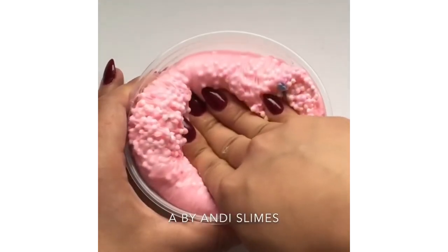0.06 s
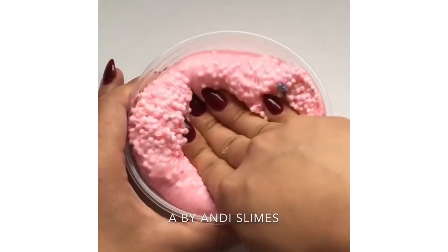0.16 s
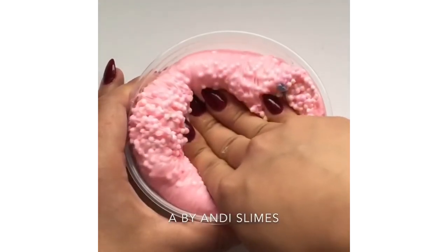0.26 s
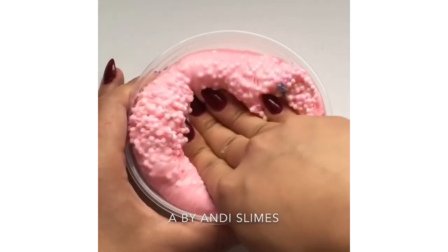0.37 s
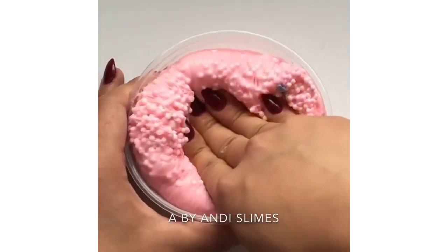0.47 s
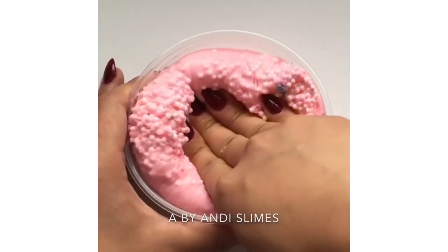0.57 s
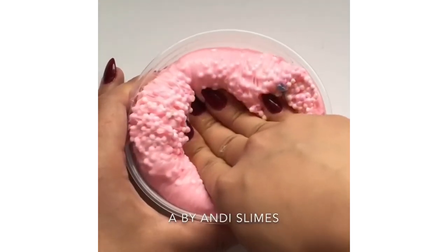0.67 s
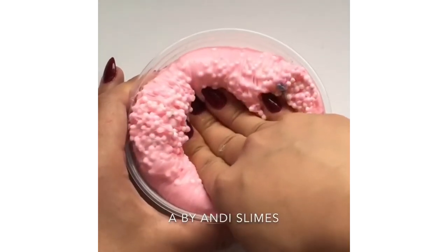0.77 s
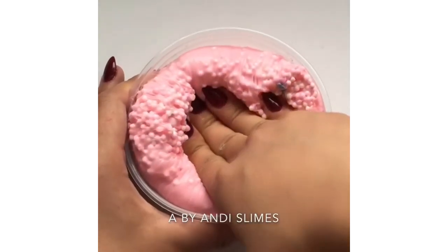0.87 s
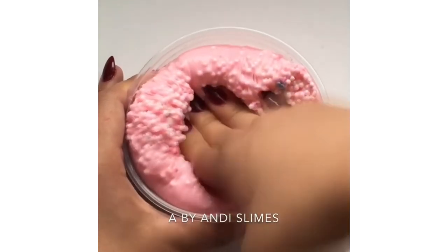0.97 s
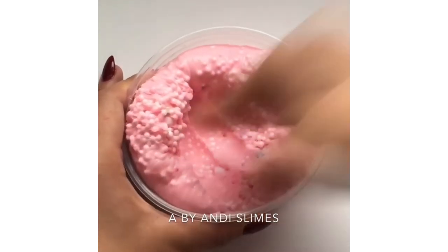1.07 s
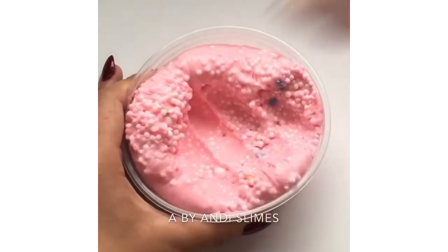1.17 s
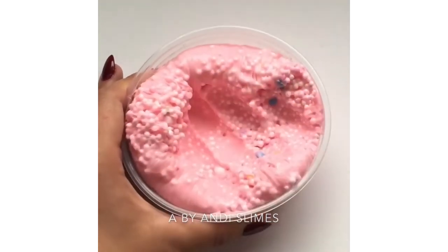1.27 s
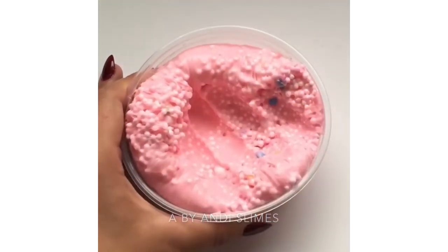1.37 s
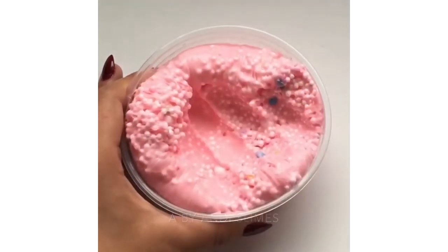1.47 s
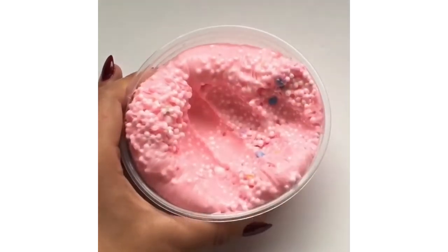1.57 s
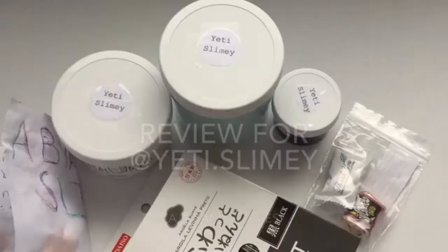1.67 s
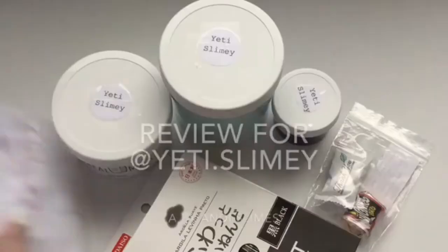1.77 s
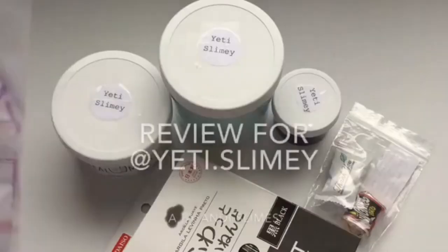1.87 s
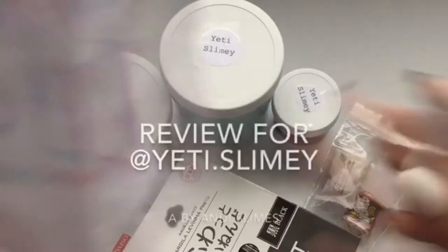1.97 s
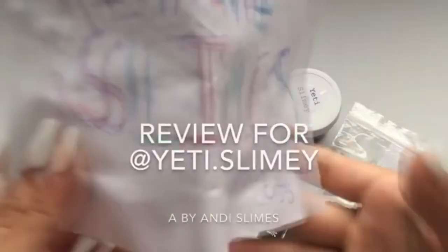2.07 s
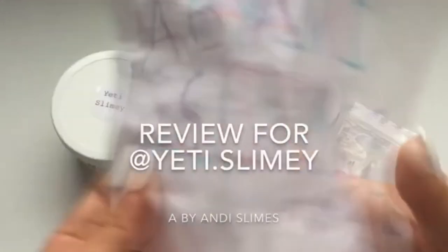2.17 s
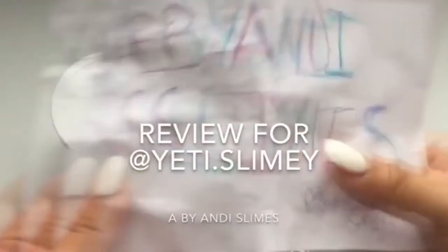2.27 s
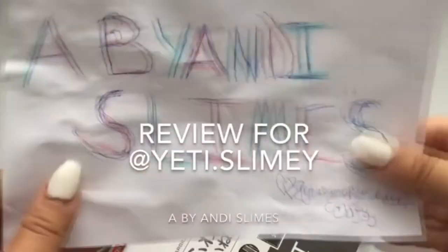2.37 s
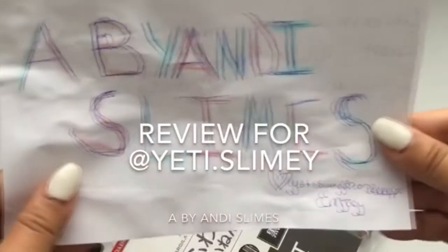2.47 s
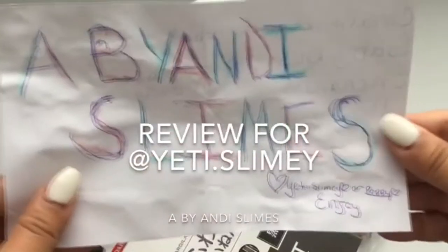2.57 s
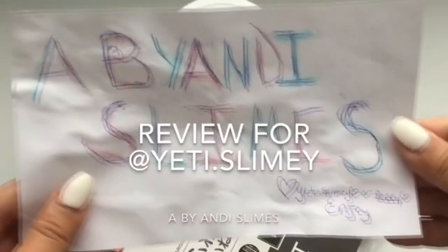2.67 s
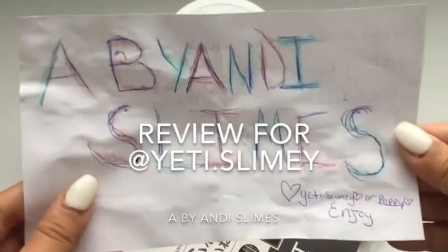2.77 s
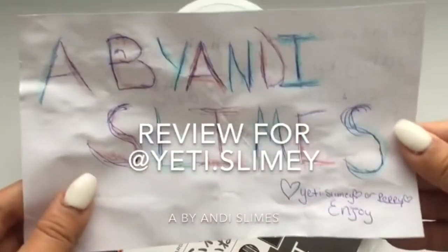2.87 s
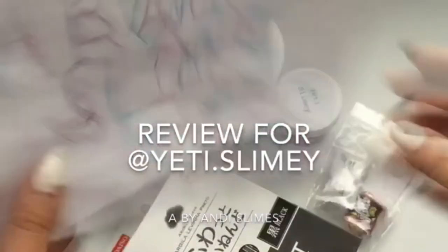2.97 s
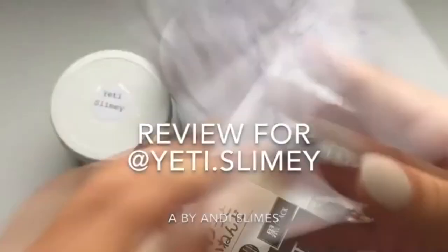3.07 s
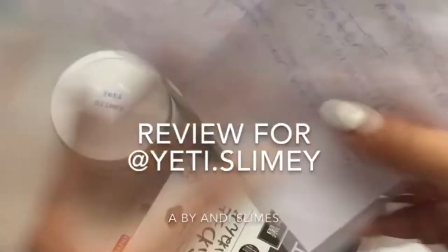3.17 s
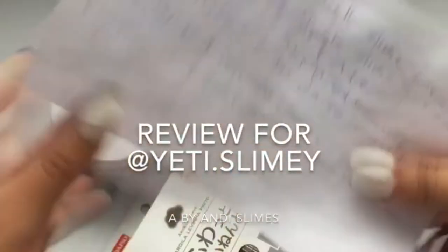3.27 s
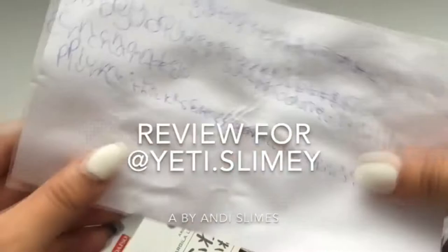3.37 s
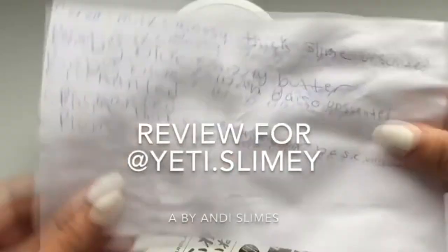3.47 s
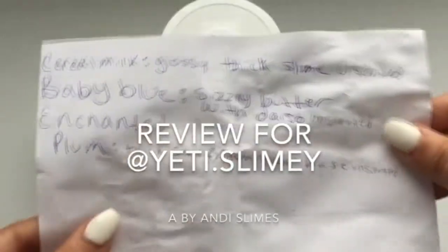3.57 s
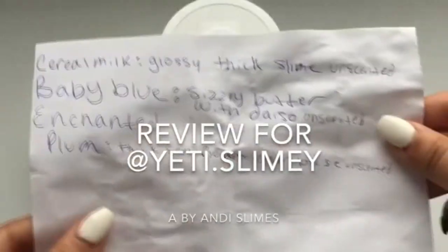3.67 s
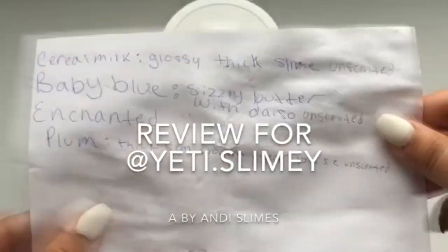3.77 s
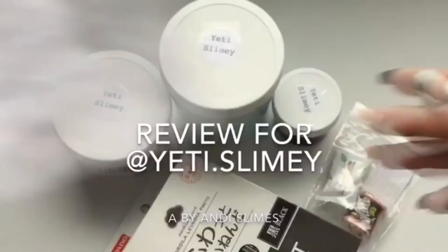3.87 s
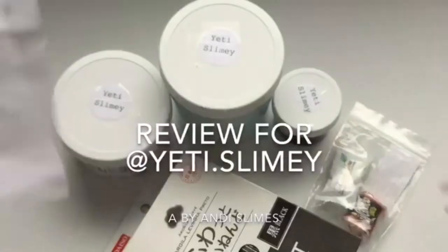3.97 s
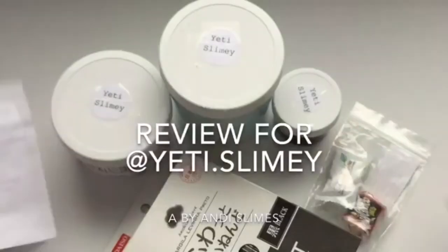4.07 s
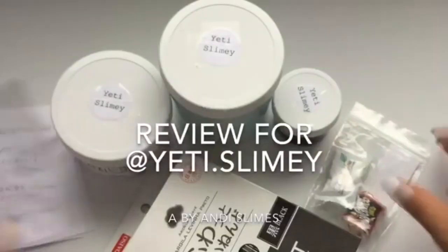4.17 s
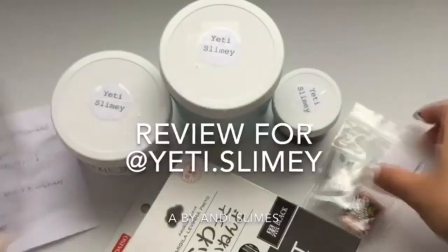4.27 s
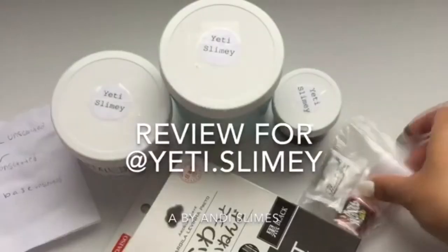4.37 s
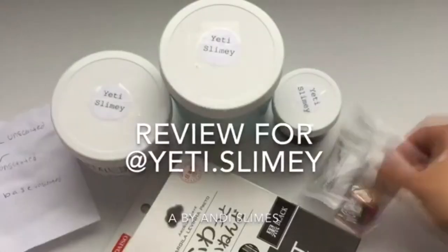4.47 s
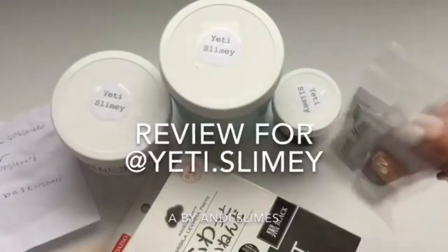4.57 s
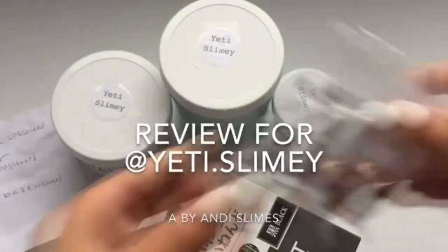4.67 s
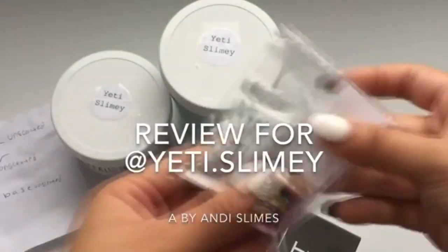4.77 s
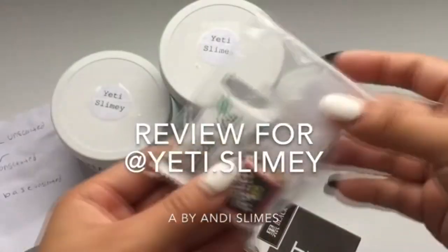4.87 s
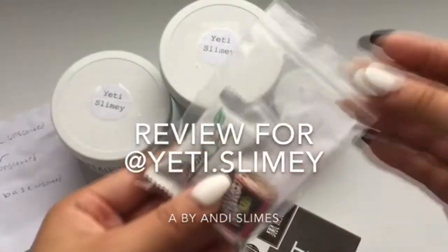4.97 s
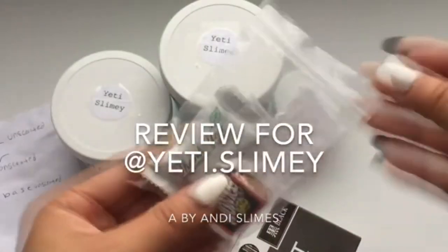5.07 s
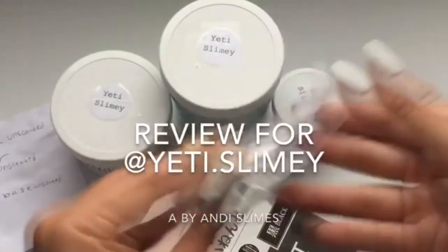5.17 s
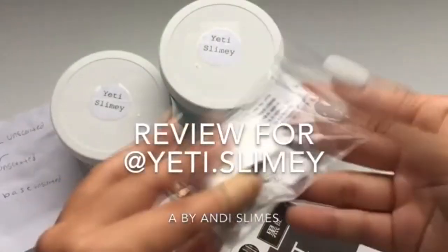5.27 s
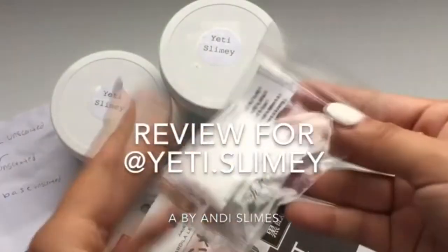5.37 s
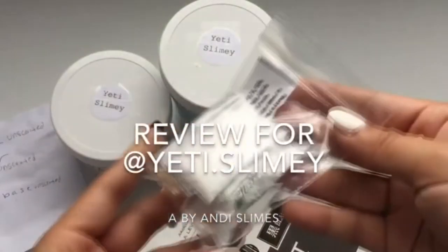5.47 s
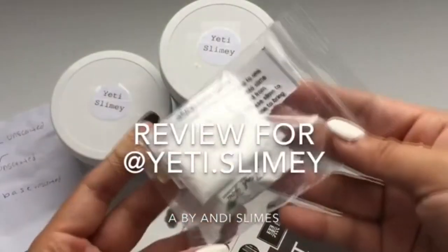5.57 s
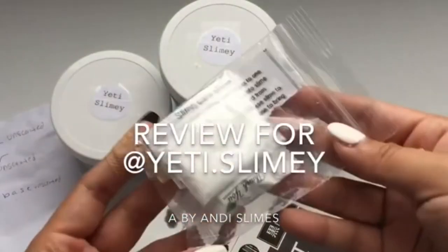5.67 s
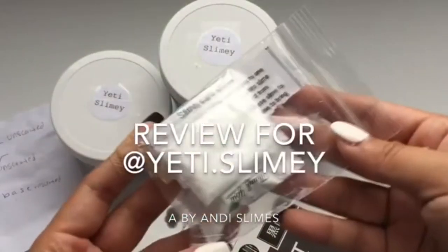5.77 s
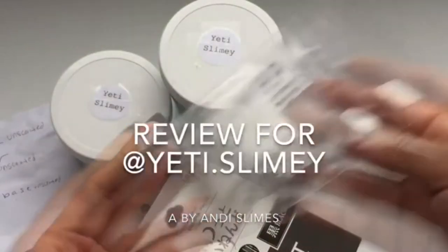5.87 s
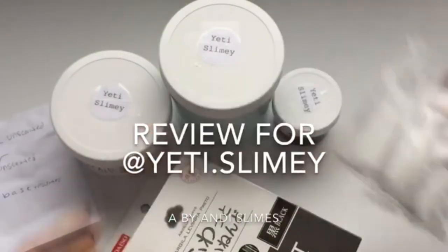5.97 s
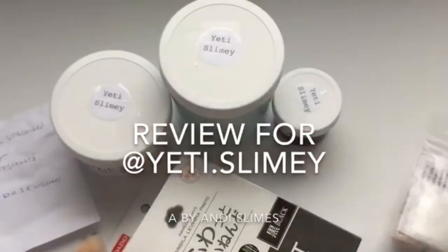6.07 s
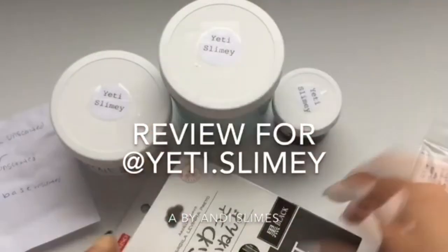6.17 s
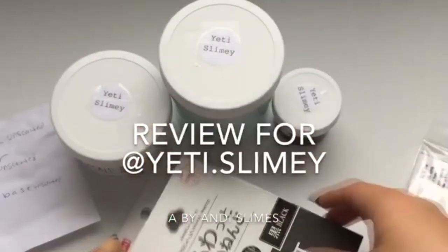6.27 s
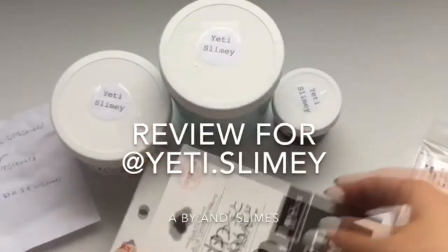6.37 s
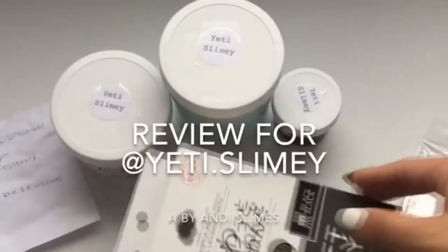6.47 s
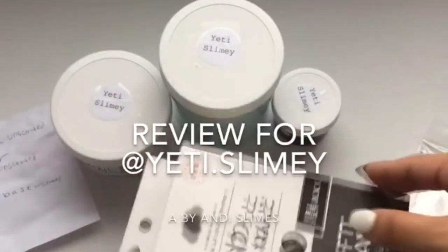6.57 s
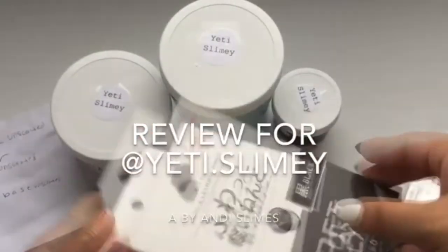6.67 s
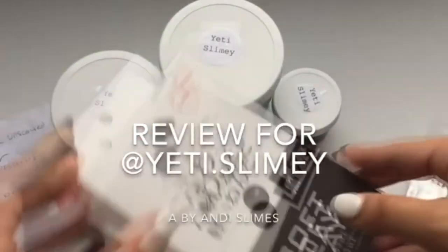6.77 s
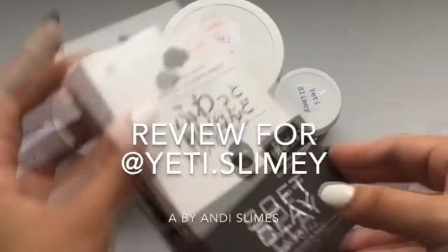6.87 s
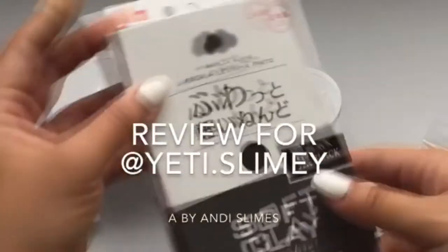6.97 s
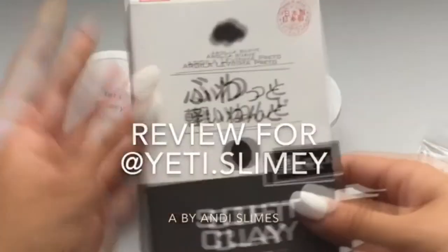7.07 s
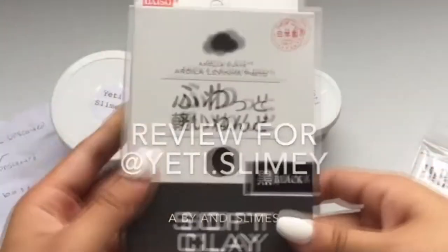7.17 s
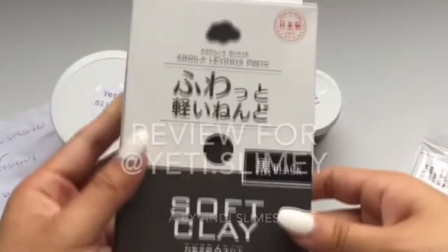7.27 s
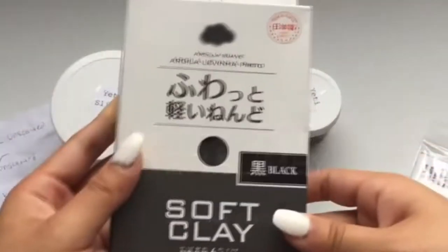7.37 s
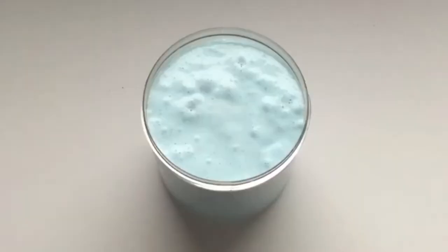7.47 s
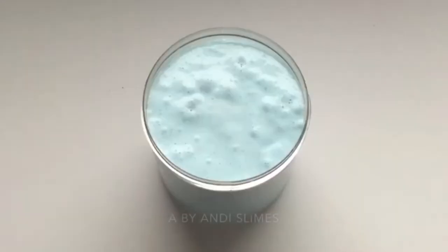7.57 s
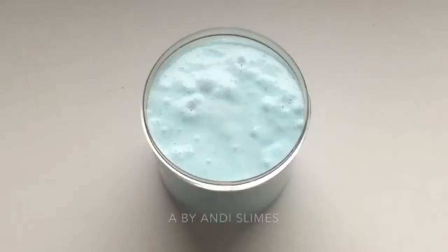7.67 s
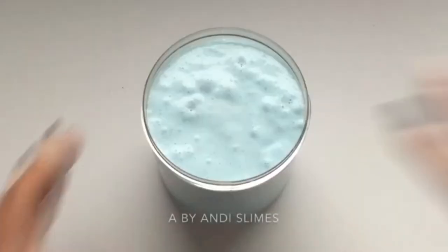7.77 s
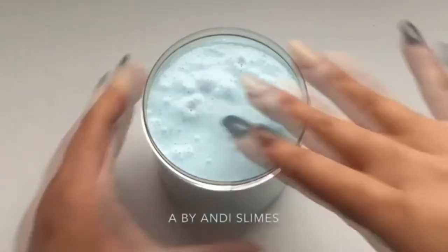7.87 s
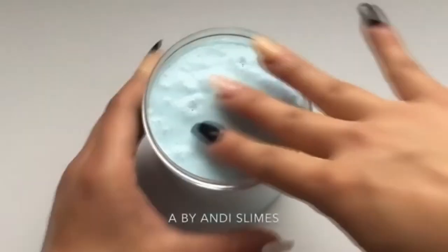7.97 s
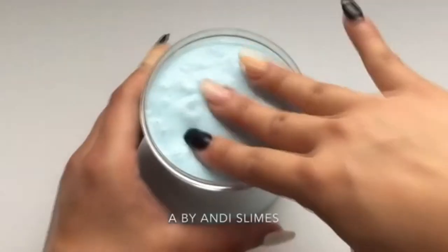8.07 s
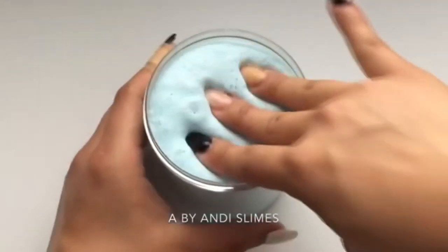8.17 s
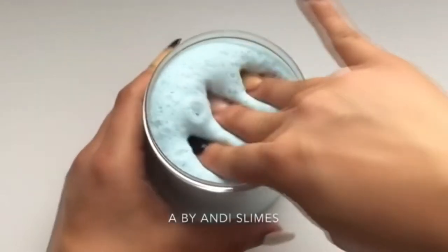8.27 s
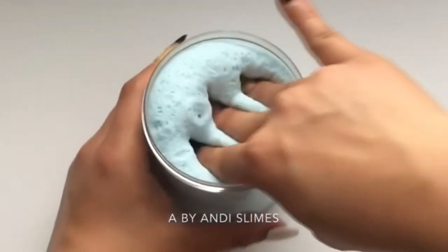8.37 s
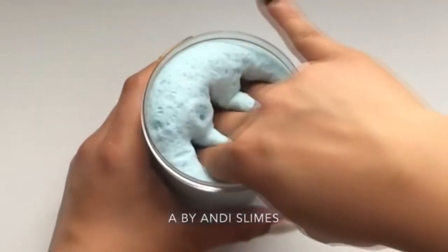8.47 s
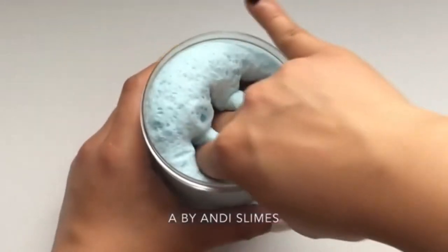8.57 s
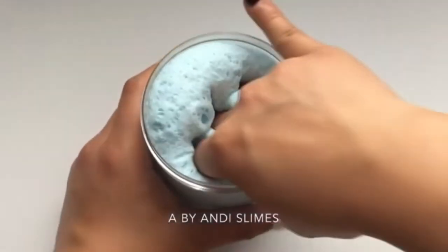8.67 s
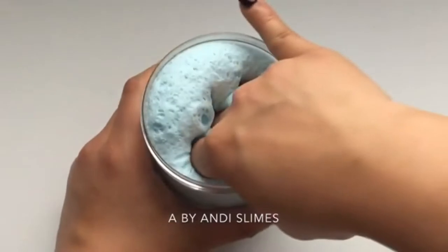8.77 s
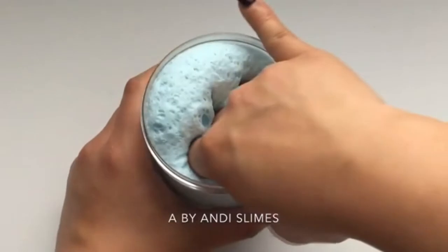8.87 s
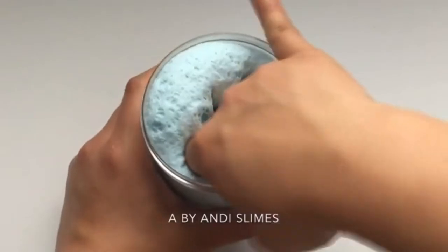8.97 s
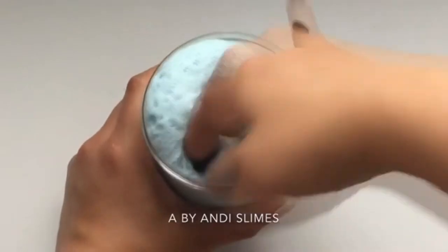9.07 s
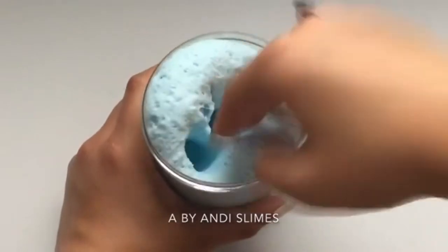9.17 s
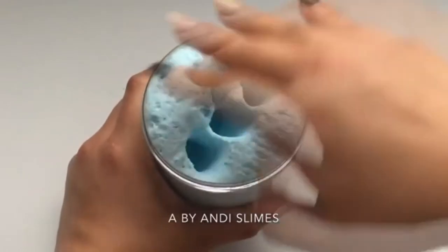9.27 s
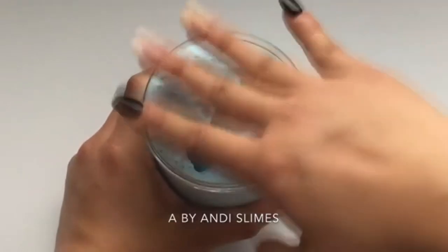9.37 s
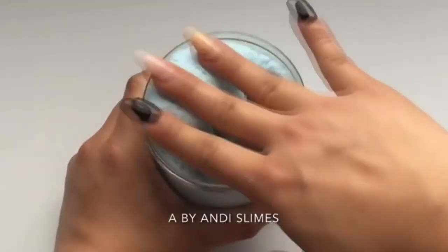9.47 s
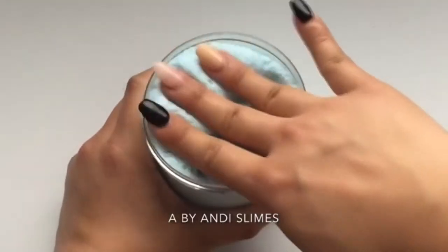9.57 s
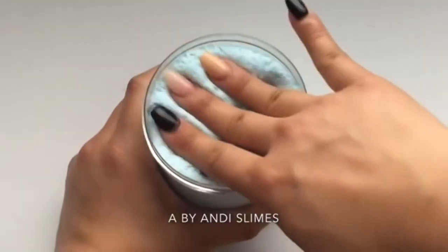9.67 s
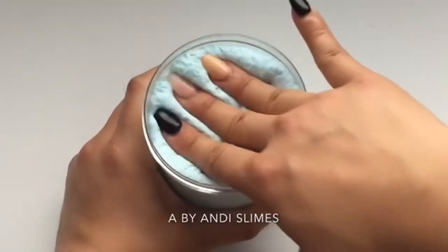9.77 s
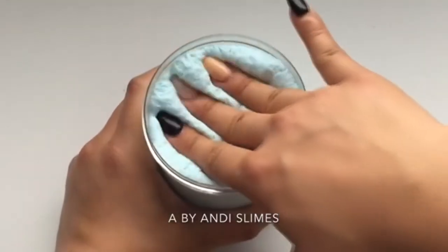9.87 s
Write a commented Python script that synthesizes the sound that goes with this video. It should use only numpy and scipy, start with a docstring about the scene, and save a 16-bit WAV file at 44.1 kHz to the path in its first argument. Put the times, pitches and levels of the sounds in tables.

```python
"""A hiss, then sticky crackles as fingers pull out of a tub of beaded slime, close to the microphone.
In a quieter room, paper notes are waved and slid, a small plastic bag crinkles and drops, and a card packet
is picked up. Last, fingers sink into foamy slime: bubbles fizz and trapped air pops with soft thuds.
Handling is clumped clicks over rubbing noise; snaps are ringing noise bursts; thuds are damped low modes."""
import sys
import numpy as np
from scipy import signal
from scipy.fft import rfft, irfft, next_fast_len
from scipy.io import wavfile
from scipy.ndimage import map_coordinates

SR = 44100
rng = np.random.default_rng(int(sys.argv[2]) if len(sys.argv) > 2 else 0)


def put_to_file(sound):
    """Save the sound as 16-bit audio at rate SR, in the file named by the first command-line argument."""
    columns = np.atleast_2d(sound).T  # one column per channel
    safe = np.clip(columns, -1, 1)
    whole_steps = np.round(safe * 32767)
    wavfile.write(sys.argv[1], SR, whole_steps.astype(np.int16))


N = 437467  # samples in the scene

# Colour of a bursting air pocket, in either slime: frequency_hz, relative_level_db
POP_COLOUR = [(40, -9), (300, 7.5), (900, 2), (1800, 2), (5000, 0), (14000, -4.5)]

SHORT = 4096  # samples in one snap or ringing body
SHORT_HZ = np.fft.rfftfreq(SHORT, 1 / SR)
SHORT_S = np.arange(SHORT) / SR
SWELL_DB = 20  # level change covered in a movement's rise or fall time


def amp(db):
    """Decibels to gain."""
    return 10 ** (np.asarray(db) / 20)


def unit(x):
    """Scale to rms 1."""
    return x / np.sqrt(np.mean(x ** 2) + 1e-20)


def burst(x, seconds):
    """Scale a short sound to the energy of rms 1 held for so many seconds."""
    return x * np.sqrt(seconds * SR / (np.sum(x ** 2) + 1e-20))


def along(points, hz):
    """Read (frequency_hz, value) points on a log frequency axis."""
    f, v = np.transpose(points)
    return np.interp(np.log(hz + 1), np.log(f + 1), v)


def wobble(rate):
    """Random levels joined by straight lines, rate knots a second."""
    knots = rng.standard_normal(int(N * rate / SR) + 4)
    return map_coordinates(knots, [np.arange(N) * rate / SR], order=1)


def filtered(x, response):
    """Multiply the spectrum of x by a response of frequency."""
    m = next_fast_len(N + SR // 2)
    hz = np.fft.rfftfreq(m, 1 / SR)
    return irfft(rfft(x, m) * response(hz), m)[:N]


def coloured(x, spectrum):
    """Filter x by a spectrum curve, then scale to rms 1."""
    return unit(filtered(x, lambda hz: amp(along(spectrum, hz))))


def resonances(modes, hz):
    """Causal response of a few damped modes, alternating in sign."""
    response = 0
    for k, (centre, width, db) in enumerate(modes):
        damping = 1j * hz * width
        response = response + (-1) ** k * amp(db) * damping / (centre * centre - hz * hz + damping)
    return response


def causal(db):
    """Minimum-phase response for a dB curve: a sharp start, then ringing."""
    cepstrum = irfft(np.log(amp(db) + 1e-6))
    fold = np.r_[1, np.full(SHORT // 2 - 1, 2), 1, np.zeros(SHORT // 2 - 1)]
    return np.exp(rfft(cepstrum * fold))


def add(track, s, sound):
    """Mix a sound into the track at time s."""
    start = int(np.clip(round(s * SR), 0, N))
    track[start:start + len(sound)] += sound[:N - start]


def effort(moves):
    """Hand movements as a gain: each swells and dies away, and overlapping ones add in power."""
    t = np.arange(0, N, 16) / SR
    power = np.zeros(len(t))
    for peak_s, db, rise_s, fall_s in moves:
        distance = np.maximum((peak_s - t) / rise_s, (t - peak_s) / fall_s)
        power += amp(db - SWELL_DB * distance) ** 2
    return np.interp(np.arange(N) / SR, t, np.sqrt(power))


def snaps(rows, spectrum, ring_db, ring_octaves, grit, gain_db):
    """Each snap is one sudden release and a brief spray of smaller ones, ringing at its own pitch."""
    track = np.zeros(N)
    treble = 1 / (1 + (5000 / (SHORT_HZ + 1)) ** 4)
    for s, db, ring_hz, treble_db, length, *_ in rows:
        spray = rng.standard_normal(SHORT) * np.exp(-SHORT_S / max(length, 1e-4))
        force = grit * spray + (SHORT_S == 0)
        octaves_away = np.log2((SHORT_HZ + 1) / ring_hz)
        ring = ring_db / (1 + (octaves_away / ring_octaves) ** 2)
        body = causal(along(spectrum, SHORT_HZ) + ring + treble_db * treble)
        add(track, s, amp(db + gain_db) * burst(irfft(rfft(force) * body), 0.0035))
    return track


def thuds(rows, modes, contact_s, gain_db):
    """The push behind each snap rings the low modes of the body under it; a longer contact is duller."""
    track = np.zeros(N)
    hz, width, db = np.transpose(modes)[:, :, None]
    rings = np.cos(2 * np.pi * hz * SHORT_S) * np.exp(-np.pi * width * SHORT_S) * width
    contact = np.sin(np.pi * np.minimum(SHORT_S / contact_s, 1)) ** 2
    for s, *_, thud_db in rows:
        strengths = amp(db + 0.52 * rng.standard_normal(db.shape))  # no two pushes ring quite alike
        ring = signal.fftconvolve(np.sum(strengths * rings, axis=0), contact)
        add(track, s, amp(thud_db + gain_db) * burst(ring, 0.0063))
    return track


def crackle(moves, spectrum, rate, spread_db, rub_db, clump_db, gain_db):
    """Tiny uneven releases, about rate a second, ring in five bands, in clumps over rubbing noise."""
    grains = np.zeros(N)
    bands_hz = np.geomspace(1300, 11000, 5)
    for ring_hz in bands_hz:
        sizes_db = spread_db * np.minimum(rng.standard_normal(N), 1.5)
        sizes = amp(sizes_db) * rng.choice([-1, 1], N)
        releases = sizes * (rng.random(N) < rate / len(bands_hz) / SR)
        mode = [(ring_hz, .45 * ring_hz, 0)]
        grains += filtered(releases, lambda hz: .35 + resonances(mode, hz))
    force = unit(grains) + amp(rub_db) * rng.standard_normal(N)
    clumps = amp(clump_db * np.tanh(wobble(90)))
    return amp(gain_db) * effort(moves) * coloured(force * clumps, spectrum)


def background():
    """Steady coloured noise: a louder hiss, a short gap, then quiet room tone that fades in and dips once."""
    # Colours of the two backgrounds: frequency_hz, relative_level_db
    hiss_colour = [(12, -29.5), (20, 3.5), (68, -9), (163, -16.5), (204, -16.5), (248, -18.5), (337, -21),
                   (513, -21.5), (873, -26), (13200, -31.5), (16000, -28.5)]
    tone_colour = [(12, -37.5), (20, -2.5), (55, -5), (86, -8), (154, -10), (187, -3), (210, -9), (241, -6),
                   (277, -14.5), (367, -17), (825, -19.5), (1220, -23.5), (1660, -24.5), (12400, -31),
                   (16000, -44)]
    hiss_db, hiss_end_s = -54, 1.606
    tone_db, tone_start_s, tone_fade_s = -65.5, 1.673, 0.068
    dip_s, dip_db, dip_length_s = 7.512, -29, .009
    t = np.arange(N) / SR
    hiss = amp(hiss_db) * (t < hiss_end_s) * coloured(rng.standard_normal(N), hiss_colour)
    fade = np.clip((t - tone_start_s) / tone_fade_s, 0, 1)
    dip = dip_db * np.exp(-((t - dip_s) / dip_length_s) ** 2)
    tone = fade * amp(tone_db + dip) * coloured(rng.standard_normal(N), tone_colour)
    return hiss + tone


def room(x):
    """A small room's answer builds over a few milliseconds; its lows linger longest but are thinned."""
    # Time for the reverberation to fall by 60 dB: frequency_hz, decay_s
    room_decay = [(150, .25), (800, 0.14), (2500, 0.16), (5000, 0.16), (14000, 0.12)]
    hz, t, z = signal.stft(rng.standard_normal(SR // 2), SR, nperseg=256)
    decay = amp(-60 * t / along(room_decay, hz)[:, None])
    tail = signal.istft(z * decay, SR, nperseg=256)[1]
    tail = tail * (1 - np.exp(-np.arange(len(tail)) / SR / 0.0023))
    wet = signal.fftconvolve(x, tail / np.linalg.norm(tail))[:N]
    return filtered(wet, lambda hz: hz ** 2 / (hz ** 2 + 150 ** 2))


def table():
    """Things land and tap on the table top, ringing its modes; the card packet rubs against the fingers."""
    # The card packet is pushed and lifted: peak_s, relative_level_db, rise_s, fall_s
    card_moves = [(6.315, -49.5, 0.058, 0.11), (6.5, -42, 0.049, 0.016), (6.67, -56, 0.033, 0.099),
                  (6.88, -56.5, 0.2, 0.38), (7.062, -47.5, 0.047, 0.027), (7.195, -50.5, 0.054, 0.043),
                  (7.312, -62.5, 0.024, 0.027), (7.49, -52, 0.012, 0.0089)]
    # Bag, packet and fingernails knocking on the table:
    # start_s, relative_level_db, ring_hz, treble_db, spray_decay_s, relative_thud_db
    knock_rows = [(6.0979, -19, 705, 12, 0.002, -47), (6.1002, -13.5, 833, -9.5, .0008, -47.5),
                  (6.1231, -26, 800, -8, 0.0086, -51), (6.1335, -17.5, 1147, -2.5, 0.0021, -41),
                  (6.2862, -40.5, 3950, -15, 0.0027, -66), (6.2913, -35, 3500, -2, 0.0016, -49),
                  (6.3122, -37.5, 2150, -38, 0.0037, -68), (6.3345, -25, 3010, 10, .0015, -57),
                  (6.3768, -36, 1080, -19, 0.0025, -33.5), (6.399, -64, 600, -22, .002, -49),
                  (6.4267, -44, 600, -27, 0.0034, -45), (6.4493, -36, 1410, -9, 0.0022, -42),
                  (6.4551, -35.5, 2590, -10, 0.003, -59), (6.4814, -51, 2080, -15, 0.00075, -47.5),
                  (6.4912, -36.5, 7190, -1, 0.00074, -53), (6.6495, -47.5, 1940, -1.5, .0022, -69),
                  (6.899, -45.5, 2270, -1.5, 0.0021, -73), (7.0577, -40, 2310, 6, 0.011, -48),
                  (7.2002, -44.5, 3620, -5, 0.00086, -79)]
    # The dropped bag's hard contents hit the table and bounce: start_s, level_db
    landings = [(6.098, -14.5), (6.1335, -24)]
    # Colours of the rubbed card and of a knock: frequency_hz, relative_level_db
    card_colour = [(120, -26.5), (200, 1), (570, -12), (1330, -12), (1600, -10), (6420, -19), (7150, -21),
                   (13200, -20.5), (15000, -43)]
    knock_colour = [(40, -21), (250, 4.5), (650, 1), (1200, 1), (2500, 0), (4500, -2.5), (10000, -5),
                    (14000, -11)]
    # Modes of the table top and of the contents' clack: frequency_hz, width_hz, relative_level_db
    table_modes = [(99.4, 16, 1), (131, 31, 3.5), (203, 120, 4.5), (300, 130, -2.5), (400, 33, -6),
                   (650, 120, 0), (885, 60, -0.5)]
    clack_modes = [(227, 31, -8.5), (404, 110, -5), (621, 130, -0.5), (680, 50, -2.5), (880, 70, -1),
                   (1170, 70, -6.5), (2300, 130, -8), (2790, 150, -9)]
    rub = crackle(card_moves, card_colour, rate=700, spread_db=5, rub_db=-6, clump_db=5, gain_db=-1)
    taps = snaps(knock_rows, knock_colour, ring_db=15.5, ring_octaves=0.11, grit=0.83, gain_db=0.0)
    clack = thuds(landings, clack_modes, contact_s=0.00018, gain_db=0)
    return rub + taps + clack + thuds(knock_rows, table_modes, contact_s=0.00091, gain_db=2.5)


def bag():
    """Thin plastic film crinkles in sparse, bright ticks as its creases let go."""
    # The bag is grabbed, turned over and dropped: peak_s, relative_level_db, rise_s, fall_s
    bag_moves = [(4.36, -44.5, 0.027, 0.043), (4.51, -42.5, 0.16, 0.14), (4.85, -47, 0.059, 0.058),
                 (4.98, -51.5, 0.094, 0.07), (5.26, -47.5, 0.16, 0.14), (5.377, -45, 0.036, 0.069),
                 (5.44, -54.5, .08, 0.17), (5.585, -56.5, 0.014, 0.11), (5.92, -45, 0.025, 0.082),
                 (6.128, -32, 0.039, 0.016)]
    # The loudest creases snapping: start_s, relative_level_db, ring_hz, treble_db
    bag_snaps = [(4.4024, -38.5, 6300, -12), (4.4535, -36.5, 2320, -8), (4.4886, -40.5, 6370, -14),
                 (4.5695, -40.5, 11390, -11), (4.603, -40.5, 7640, 3), (4.622, -49, 5810, 9),
                 (4.7365, -42, 9200, 5), (4.8106, -46, 7260, 5), (4.863, -46.5, 4410, 1),
                 (4.9338, -50.5, 4310, -4), (4.971, -43, 6350, 14), (5.0346, -50, 7400, -3),
                 (5.0882, -49, 3700, -2), (5.1601, -38.5, 5150, 10), (5.204, -45, 6270, 8),
                 (5.2388, -38, 6910, 6), (5.2727, -42, 8300, 0), (5.2824, -38, 3700, 4),
                 (5.3106, -35.5, 7240, 7), (5.373, -34.5, 4870, -2), (5.3808, -33, 7340, 5),
                 (5.409, -31.5, 6660, 8), (5.4308, -38.5, 5060, 0), (5.4498, -37, 5330, 3),
                 (5.4828, -44.5, 5300, -5), (5.7396, -54.5, 1730, 0), (5.771, -50, 8900, -3),
                 (5.8722, -52.5, 7890, -2.5), (5.9036, -40.5, 6500, -8), (6.1105, -30, 5560, 2),
                 (6.2254, -46, 2900, 3)]
    # Colours of the crinkling and of one snap: frequency_hz, relative_level_db
    film_colour = [(180, -45.5), (300, 0.5), (1080, -3.5), (2600, -4.5), (3550, -1), (6950, -5), (8880, -8),
                   (13400, -7.5), (15000, -9.5)]
    snap_colour = [(40, -23), (300, -7), (1200, -8), (3500, -2.5), (8000, -6), (14000, -5.5)]
    snap_s = 0.0025  # spray decay: the film lets go equally fast at every crease
    crinkle = crackle(bag_moves, film_colour, rate=550, spread_db=6.5, rub_db=-8, clump_db=4, gain_db=-1)
    creases = [(*snap, snap_s) for snap in bag_snaps]
    return crinkle + snaps(creases, snap_colour, ring_db=10.5, ring_octaves=0.55, grit=0.12, gain_db=-1)


def scrape():
    """A note slides hollowly over the table; its edge chatters at a pitch that sinks, then lifts a little."""
    # The note skids in two pushes: peak_s, relative_level_db, rise_s, fall_s
    slides = [(4.265, -34.5, 0.044, 0.18), (4.435, -50.5, 0.038, 0.17)]
    # Hollow resonances of the slide: frequency_hz, width_hz, relative_level_db
    slide_modes = [(124.5, 9.5, 3.5), (248, 77, -2.5), (441, 53, -2), (800, 190, -4.5), (1195, 80, -2),
                   (1640, 950, -7.5)]
    # Pitch of the chattering paper edge: time_s, pitch_hz
    chatter_pitch = [(4.249, 1050), (4.318, 920), (4.391, 800), (4.48, 867)]
    top_hz = 2400  # the soft edge excites little above this
    grip = amp(3 * wobble(70))
    rubbing = grip * rng.standard_normal(N)
    hollow = unit(filtered(rubbing, lambda hz: resonances(slide_modes, hz) / (1 + (hz / top_hz) ** 4)))
    pitch = np.interp(np.arange(N) / SR, *np.transpose(chatter_pitch))
    edge = np.sin(2 * np.pi * np.cumsum(pitch) / SR)
    chatter = unit(grip * wobble(300) * edge)
    rasp = hollow + .85 * chatter
    return amp(-3.5) * effort(slides) * rasp


def puff(s, db, fall_s, rise_s, rebound, rebound_s):
    """A flicked sheet pushes air at the microphone: a sharp suction and a slow rebound."""
    track, t = np.zeros(N), np.arange(SR // 2) / SR
    push = np.exp(-t / fall_s) - rebound * np.exp(-t / rebound_s)
    push *= 1 - np.exp(-t / rise_s)
    add(track, s, -amp(db) * push)
    return track


def paper():
    """The notes rustle, buckle in ringing snaps, and flap on the low modes of the sheet."""
    # A note is lifted, turned or laid down: peak_s, relative_level_db, rise_s, fall_s
    paper_moves = [(1.822, -58, 0.032, 0.15), (2.293, -52, 0.053, 0.012), (2.355, -46.5, 0.039, 0.17),
                   (2.46, -56.5, .06, 0.22), (2.99, -57.5, 0.012, 0.17), (3.16, -31.5, 0.031, 0.022),
                   (3.245, -44, 0.094, 0.058), (3.315, -52.5, .05, .08), (3.45, -51, 0.18, 0.22),
                   (3.865, -47.5, 0.031, 0.035), (3.935, -55.5, 0.053, .04), (4.22, -37.5, 0.065, .1)]
    # Creases snapping: start_s, relative_level_db, ring_hz, treble_db, spray_decay_s, relative_flap_db
    paper_snaps = [(1.7885, -46, 11480, 17, 0.0017, -47), (1.8011, -37.5, 600, 17.5, .0093, -31.5),
                   (1.819, -46, 6420, 9, .0023, -54), (1.8313, -33.5, 3080, 13, .0023, -43),
                   (2.0508, -31, 2400, 12.5, 0.0017, -53), (2.207, -56.5, 8380, 13, 0.0037, -65),
                   (2.2854, -36.5, 3050, 11.5, .0063, -46.5), (2.3291, -56, 4160, 5, 0.0021, -42),
                   (2.3802, -33, 4040, 17, 0.00064, -64), (2.4131, -40, 3040, 4, 0.0036, -64),
                   (2.4371, -44, 1010, 10, 0.0054, -71), (2.4676, -35.5, 7160, 15, 0.00075, -51),
                   (3.088, -44.5, 9450, 18, 0.0071, -79), (3.118, -39.5, 4240, 19, .0027, -51),
                   (3.1466, -21, 8900, 16, 0.0024, -68), (3.2241, -36.5, 4930, 15, 0.0086, -49),
                   (3.4663, -41.5, 4440, 0, 0.0033, -59), (3.5509, -37, 4470, 7, 0.0011, -80),
                   (3.596, -45, 4200, 7, 0.0037, -66), (3.6408, -46, 4300, 5, 0.0021, -59),
                   (4.1564, -46, 8600, 11, 0.005, -44.5), (4.193, -35, 4650, 12, 0.0023, -51),
                   (4.2102, -21, 4360, 12, 0.002, -46), (4.2321, -40, 5240, -30, 0.003, -36)]
    # Colours of the rustle and of one snap: frequency_hz, relative_level_db
    rustle_colour = [(88, -7), (150, -4.5), (393, -7.5), (505, -10.5), (742, -9.5), (2500, -14),
                     (4810, -9.5), (5950, -12.5), (13400, -14), (15000, -27.5)]
    snap_colour = [(40, -39), (200, -1), (700, 10.5), (1600, 9.5), (4500, 6), (7000, -4), (14000, -12)]
    # Modes of the flapping sheet: frequency_hz, width_hz, relative_level_db
    sheet_modes = [(141, 65, 1.5), (234.5, 78, -0.5), (340, 65, 3), (545, 87, -3.5)]
    rustle = crackle(paper_moves, rustle_colour, rate=1100, spread_db=5, rub_db=-3.5, clump_db=3, gain_db=-1)
    creases = snaps(paper_snaps, snap_colour, ring_db=7, ring_octaves=0.16, grit=0.95, gain_db=1.5)
    return rustle + creases + thuds(paper_snaps, sheet_modes, contact_s=0.0012, gain_db=-4.5)


def beaded_slime():
    """Sticky threads and bubbles break as the fingers pull out; the soft mass thuds in its tub."""
    # Fingers shift in the slime, then pull out: peak_s, relative_level_db, rise_s, fall_s
    bead_pulls = [(.1, -55, .06, 0.21), (.87, -55.5, .08, .1), (.96, -32, 0.093, 0.082)]
    # Air pockets bursting: start_s, relative_level_db, ring_hz, treble_db, spray_decay_s, relative_thud_db
    bead_pops = [(0.0913, -45.5, 12680, 4, 0.00043, -74), (0.9058, -33, 13100, 3.5, 0.0087, -56),
                 (0.9288, -30, 13100, 29, 0.005, -51), (0.9511, -35, 11900, 17, 0.0074, -62),
                 (0.9605, -24, 4870, 26, 0.0017, -54), (0.9789, -28, 12200, 14.5, 0.013, -56.5),
                 (0.988, -63, 12980, 7, 0.0031, -43.5), (1.0125, -28, 12700, 23, 0.0013, -37),
                 (1.0297, -38.5, 4090, 8, 0.0041, -44.5), (1.1794, -33.5, 13600, -2, 0.0023, -63)]
    # Colour of the crackling beads: frequency_hz, relative_level_db
    bead_colour = [(59, -32), (100, 14), (152, -8.5), (304, -2.5), (594, -8), (1090, -8), (3250, -17),
                   (4840, -9), (6620, -14), (13000, -8.5), (15000, -19)]
    # Modes of the filled tub: frequency_hz, width_hz, relative_level_db
    bead_tub_modes = [(75, 23, 0), (225, 18, 7.5), (334, 49, -18), (640, 440, -1.5)]
    beads = crackle(bead_pulls, bead_colour, rate=1200, spread_db=5.5, rub_db=-8, clump_db=3.5, gain_db=-2)
    beads += snaps(bead_pops, POP_COLOUR, ring_db=13.5, ring_octaves=0.091, grit=0.81, gain_db=-0.5)
    return beads + thuds(bead_pops, bead_tub_modes, contact_s=0.0016, gain_db=3.0)


def foamy_slime():
    """Tiny bubbles fizz and air pockets pop under the fingers, while the moving mass rumbles and thuds."""
    # Fingers touch, sink into, squeeze and leave the foam:
    # peak_s, relative_fizz_db, relative_moving_mass_db, rise_s, fall_s
    foam_presses = [(8.04, -79.5, -54.5, .03, 0.11), (8.15, -62.5, -68, 0.09, 0.26),
                    (8.24, -70, -50, .04, 0.089), (8.37, -60, -50.5, 0.29, 0.46),
                    (8.6, -54.5, -72, 0.6, 0.49), (8.8, -61, -63.5, 0.35, 0.46),
                    (9.074, -46.5, -37, 0.063, 0.089), (9.554, -54, -55.5, 0.17, 0.22),
                    (9.655, -61, -40.5, .05, .05), (9.76, -57.5, -69, 0.37, 0.43),
                    (9.89, -53, -70, 0.095, .028)]
    # Air pockets bursting: start_s, relative_level_db, ring_hz, treble_db, spray_decay_s, relative_thud_db
    foam_pops = [(8.1313, -48, 12120, 11, 0.00047, -74), (8.1377, -43.5, 7300, 6.5, 0.00071, -63),
                 (8.2452, -41.5, 7550, -5.5, 0.00053, -55), (8.4125, -46, 8120, 10, .0005, -63),
                 (8.5904, -42.5, 9100, 19, .0005, -72), (8.6556, -43.5, 12000, 5, 0.0054, -60),
                 (8.6998, -43.5, 12600, 16, 0.00036, -72), (8.8025, -54, 8120, -4.5, .0005, -67),
                 (8.8633, -52, 1750, .5, .0006, -76), (9.0638, -34.5, 1542, -4.5, 0.0034, -39.5),
                 (9.085, -56, 590, -6, .004, -37.5), (9.1012, -34.5, 2740, -1, 0.0041, -56),
                 (9.1337, -34.5, 7400, 3, 0.00028, -47), (9.174, -60, 730, -20, 0.0048, -42.5),
                 (9.4946, -49, 8700, 17, .0004, -67), (9.5546, -53, 1890, -1, .0005, -69),
                 (9.6218, -32.5, 10500, -3, 0.0039, -34), (9.6342, -41.5, 7110, -4, 0.0003, -41),
                 (9.6556, -37, 1850, 2, .0007, -65), (9.6661, -27.5, 524, -1, 0.0012, -31.5),
                 (9.7666, -45, 12000, 11, 0.00034, -67), (9.8539, -45.5, 12700, 21, .0004, -75),
                 (9.9074, -37, 9410, 8.5, 0.0043, -67)]
    # Colours of the fizz and of the moving mass: frequency_hz, relative_level_db
    fizz_colour = [(350, -34), (600, -13), (785, -12.5), (852, -14.5), (1650, -5.5), (4460, -8),
                   (12600, -5), (14000, -8.5), (15000, -24)]
    mass_colour = [(18, -33), (30, -2.5), (146, 0.5), (185, -19.5), (241, -15.5), (313, -19), (524, -16.5),
                   (700, -24), (910, -28), (1540, -120)]
    # Modes of the filled tub: frequency_hz, width_hz, relative_level_db
    foam_tub_modes = [(62, 13, -17), (114, 26, 15), (148, 27, 18.5), (320, 136, -10.5)]
    fizzing = [(s, fizz_db, rise, fall) for s, fizz_db, _, rise, fall in foam_presses]
    kneading = [(s, mass_db, rise, fall) for s, _, mass_db, rise, fall in foam_presses]
    foam = crackle(fizzing, fizz_colour, rate=650, spread_db=6, rub_db=-6, clump_db=3, gain_db=-2)
    foam += snaps(foam_pops, POP_COLOUR, ring_db=10.5, ring_octaves=0.17, grit=0.26, gain_db=-0.5)
    foam += thuds(foam_pops, foam_tub_modes, contact_s=0.0072, gain_db=1)
    mass = amp(-2.5) * effort(kneading) * coloured(rng.standard_normal(N), mass_colour)
    return foam + mass


def scene():
    """Things held in the air stir the room more than those down on the table."""
    soft = beaded_slime() + foamy_slime()
    held = paper() + bag()
    set_down = table() + scrape()
    air = puff(s=3.1466, db=-6.5, fall_s=0.0027, rise_s=0.00042, rebound=0.046, rebound_s=0.062)
    echo = room(amp(-12.0) * soft + amp(-10.5) * held + amp(-15.5) * set_down)
    return (soft + held + set_down + air + echo + background())[None]


def record(dry):
    """The recorder rounds off the highest peaks and cuts steeply above its band limit."""
    ceiling, top_hz = .85, 14200  # ceiling as a fraction of full scale
    rounded = ceiling * np.tanh(dry[0] / ceiling)
    return filtered(rounded, lambda hz: 1 / np.sqrt(1 + (hz / top_hz) ** 110))[None]


dry = scene()
out = record(dry)
put_to_file(out)
```